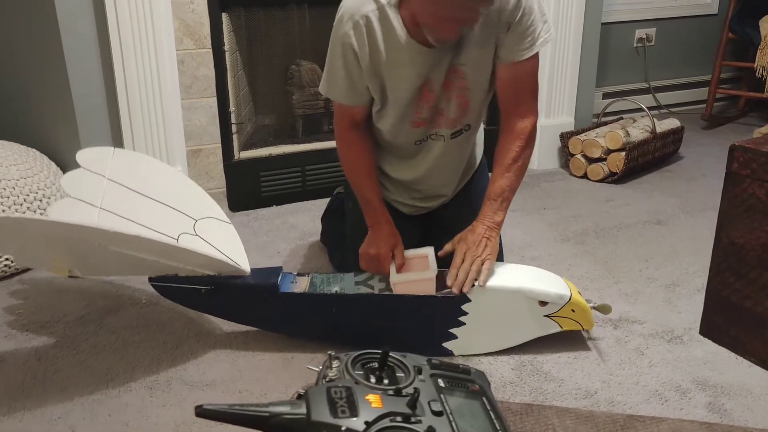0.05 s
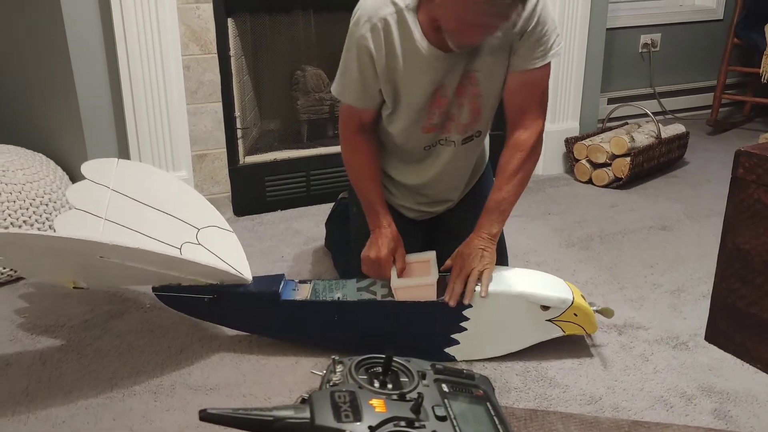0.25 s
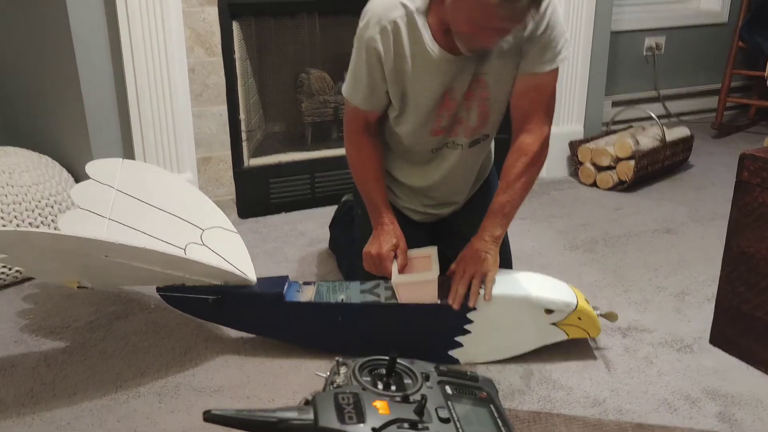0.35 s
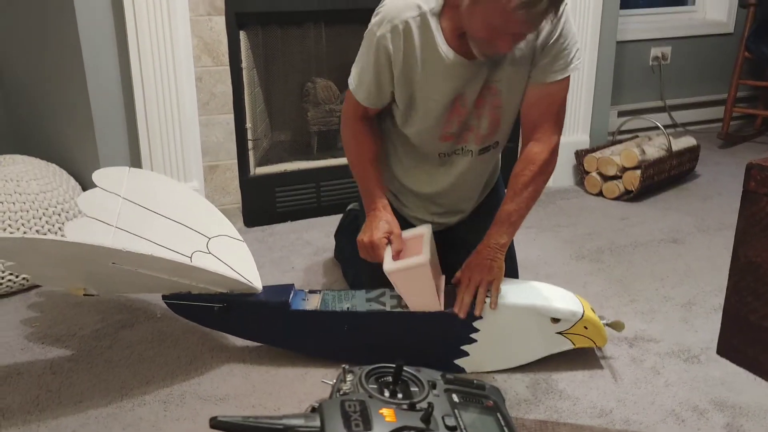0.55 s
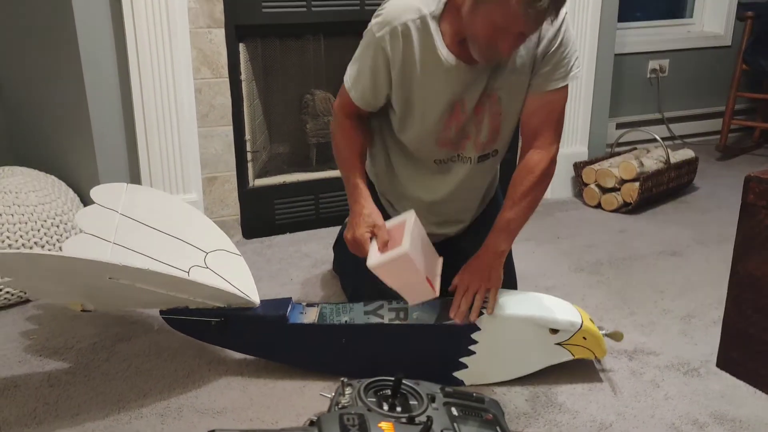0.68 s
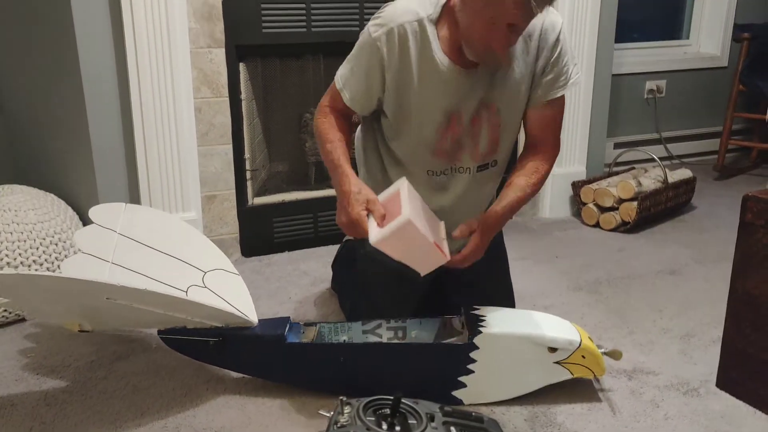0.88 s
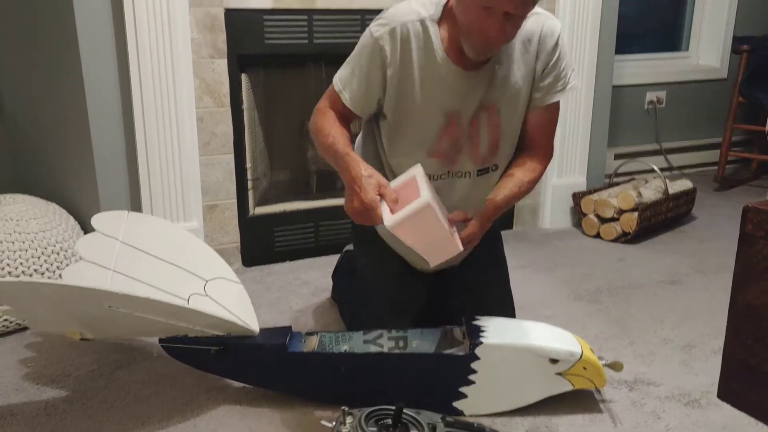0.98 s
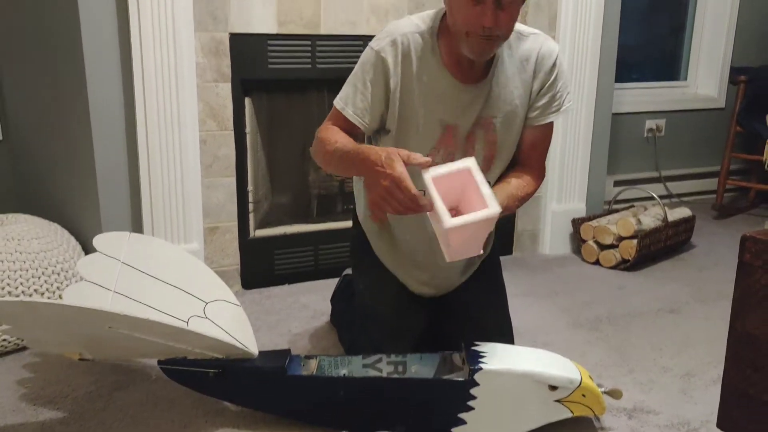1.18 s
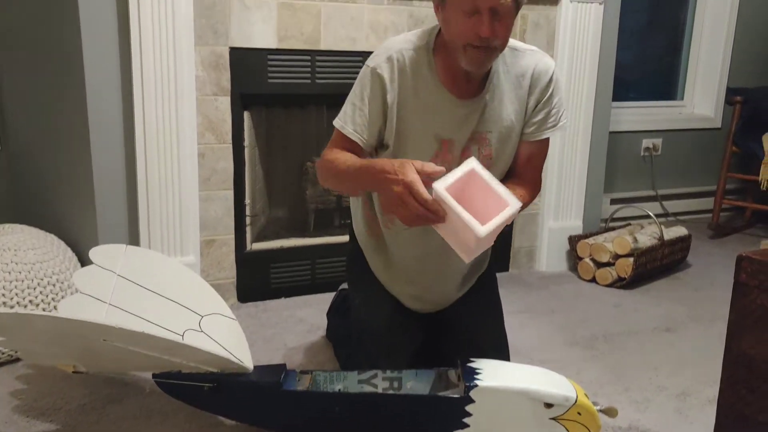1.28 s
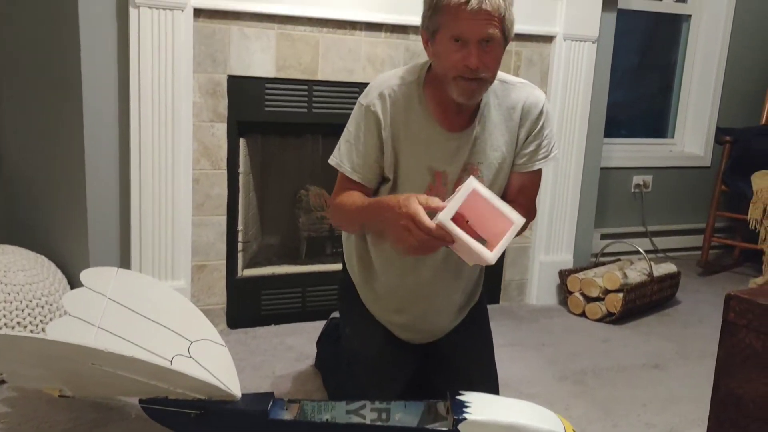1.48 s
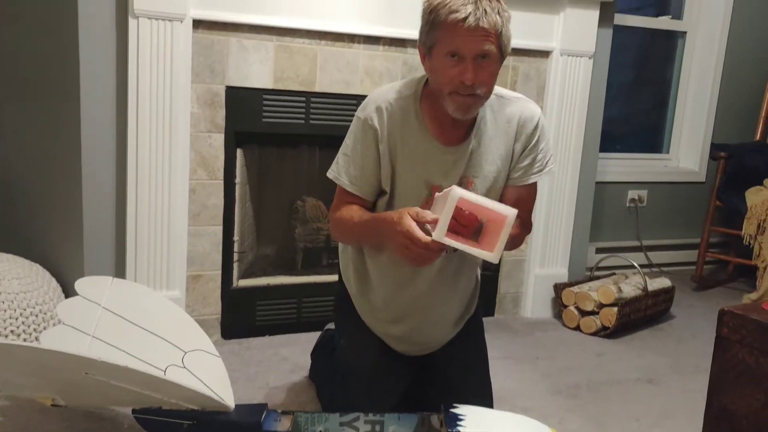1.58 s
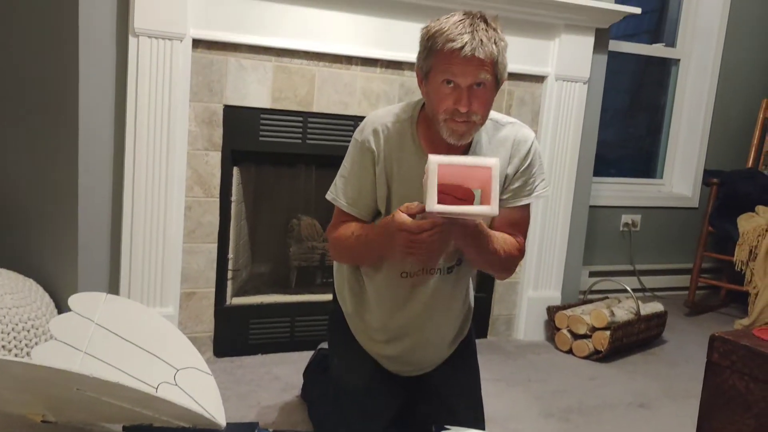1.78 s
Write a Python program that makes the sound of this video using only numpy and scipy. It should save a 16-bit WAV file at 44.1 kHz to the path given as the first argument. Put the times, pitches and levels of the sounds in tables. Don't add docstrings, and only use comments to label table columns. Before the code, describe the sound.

Dry foam-on-foam scraping with dull hollow knocks and snaps, then faint finger rustles in a quiet room

```python
import sys
import numpy as np
from scipy import signal
from scipy.fft import rfft, irfft, next_fast_len
from scipy.io import wavfile
from scipy.ndimage import uniform_filter1d, map_coordinates

SR = 44100
rng = np.random.default_rng(int(sys.argv[2]) if len(sys.argv) > 2 else 0)


def to_linear_factor(level_db):
    exponent = np.asarray(level_db, float) / 20
    return 10 ** exponent


def dump(signal):
    limited = np.clip(np.atleast_2d(signal).T, -1, 1)
    pcm = np.round(limited * 32767).astype(np.int16)
    wavfile.write(sys.argv[1], SR, pcm)


N = 81585

# (frequency [Hz], density [dB per Hz])
HISS_SPECTRUM = [(25, -45), (45, -26), (117, -14), (330, -18), (600, -17.5), (960, -24), (5000, -29),
                 (15900, -31.5)]
# (frequency [Hz], level [dB rms])
MAINS_HUM = [(60, -85), (119, -79.5)]
# (time [s], friction [dB], brightness [dB], hull drive [dB])
DRAG_STROKES = [
    [(0, -55, 7, 8), (.034, -63.5, 2, -1), (.08, -71, 7, 6), (.12, -59, 9, 5.5), (.16, -55, 4.5, 7),
     (.222, -48.5, 3, 8.5), (.24, -45, 6.5, 4)],
    [(.296, -46, 0, 4), (.315, -38, 1, 1), (.33, -35, -9, -2.5), (.36, -32, -3.5, -3.5),
     (.384, -34, 2, -4.5), (.394, -28, -0.5, 0.5), (.41, -38.5, 9.5, 9.5), (.432, -35, 3, 1.5)],
    [(.465, -41.5, 5, -10), (.478, -47.5, 9, -6), (.495, -42, 3, -16), (.514, -43, 7, 1),
     (.53, -42, 12, -2), (.552, -54.5, 11.5, 4), (.575, -51, 2, 3)],
    [(.586, -53.5, -1, -3.5), (.6, -57, 6, -3), (.624, -67, 0, -24), (.68, -65, 5, 8),
     (.692, -65.5, -10, 20.5), (.71, -69.5, 3, 9), (.788, -71, -1, 1), (.86, -88, -7, 3)],
]
# (time [s], pitch [Hz])
CAVITY_PITCH = [(0, 192.8), (0.251, 202.9), (0.379, 252.3), (1.85, 222)]
# (frequency [Hz], density [dB per Hz])
FOAM_SPECTRUM = [(59, -57), (100, -17), (244, -32), (289, -6.5), (1080, -5.5), (2510, -12), (4180, -9),
                 (12100, -17), (15900, -22)]
# (frequency [Hz], width [Hz], gain [dB])
WALL_MODES = [(1090, 150, -0.5), (2050, 57, 9.5), (3350, 480, 2.5), (4200, 1500, 4), (11500, 3200, 7)]
# (frequency [Hz], left-right likeness [0-1])
PORT_LIKENESS = [(60, 0.86), (500, 1), (1200, 0.48), (2400, 0.31), (15000, 0.057)]
# (frequency [Hz], left minus right [dB])
DRAG_LEAN = [(60, -12), (240, -4.5), (950, 0.5), (3770, -7.5), (15000, 0)]
# (middle [s], length [s], pitch [Hz], level
# [dB rms])
TONE_SWELLS = [(0.02, 0.07, 197, -56), (.13, .06, 200, -61), (.012, .045, 685, -57), (.012, .045, 456, -59),
               (0.043, 0.015, 4200, -66.5), (0.129, 0.0048, 4200, -43.5), (.405, .022, 185, -35),
               (.409, .024, 390, -32), (.414, .03, 610, -43), (.425, .016, 235, -37), (.452, .045, 195, -41),
               (.46, .04, 320, -40), (.492, .025, 200, -45), (.537, .04, 205, -42), (.54, .045, 315, -44),
               (.59, .035, 215, -49), (.698, .03, 205, -56), (.53, .03, 14000, -48), (1.02, .03, 150, -68),
               (1.148, .012, 200, -66), (.98, .035, 15000, -64), (1.565, .035, 14200, -62),
               (.39, .03, 12300, -44), (.51, .03, 260, -50), (.565, .03, 270, -50), (.18, .02, 400, -50),
               (0.338, 0.047, 1580, -45), (.345, 0.069, 423, -51), (0.518, 0.018, 11500, -55),
               (.66, 0.0052, 7900, -67), (.693, 0.025, 2180, -69), (1.131, 0.018, 930, -66),
               (0.329, 0.0093, 4200, -43), (0.342, 0.066, 1090, -45), (0.386, 0.0083, 1410, -57),
               (0.521, 0.035, 1770, -55), (0.989, 0.058, 530, -64), (1.021, 0.02, 1880, -54),
               (1.112, 0.041, 1730, -64), (1.233, 0.07, 996, -65), (1.225, .06, 480, -66),
               (1.225, 0.075, 1994, -60.5), (1.385, 0.025, 650, -66), (1.5, 0.049, 530, -62.5),
               (1.574, 0.032, 1900, -60), (1.666, 0.016, 1790, -67.5), (1.725, 0.03, 5900, -66)]
# (time [s], peak [dB], decay t60 [s])
HULL_KNOCKS = [(.003, -53.5, 0.16), (0.109, -54, 0.039), (.149, -55, .05), (0.175, -42.5, 0.06),
               (0.234, -39.5, 0.14), (.397, -32, 0.049), (.404, -30, 0.056), (.414, -30, 0.05),
               (.425, -33, .05), (.438, -34, 0.15), (0.477, -39, 0.14), (0.521, -38, 0.12),
               (.58, -46, 0.055), (.684, -53, 0.033), (.697, -51.5, 0.062), (0.938, -57.5, 0.014)]
# (frequency [Hz], width [Hz], gain [dB])
HULL_MODES = [(101, 127, -12), (187, 31, 2.5), (240.7, 28, -1), (311, 41, 0.5), (384.3, 45, 1),
              (577, 125, -1.5)]
# (time [s], peak [dB], ring [Hz], ring gain [dB], decay t60 [s])
SLIP_SNAPS = [(0.0425, -41, 4350, 8.5, 0.064), (0.0908, -44, 4170, 11, 0.018),
              (0.1027, -47, 6060, 1, 0.0039), (.1101, -36, 3720, 0, 0.0083), (0.1262, -47, 4200, 23, 0.038),
              (0.148, -35, 3400, 0, 0.022), (0.172, -30, 3990, 6.5, 0.03), (.2085, -41, 3970, 1, 0.013),
              (0.2292, -26, 3000, 0, 0.02), (.2322, -23, 4000, 8, .018), (0.3756, -32, 11500, 10, 0.012),
              (.581, -37, 4240, -2, 0.05), (0.6834, -47, 2103, 20, 0.031),
              (1.0076, -36.5, 2380, 49, 0.0055), (1.1225, -49, 3900, 27, 0.0082),
              (1.1475, -40.5, 5000, 0, 0.007), (1.2047, -39, 2000, 40, 0.011), (1.2047, -41, 4080, 25, .02)]
# (time [s], friction [dB], brightness [dB])
FINGER_GRIPS = [
    [(.962, -96, 0), (.967, -52, 3), (1.028, -51, -3.5), (1.054, -58, -7), (1.09, -64, 9.5),
     (1.11, -58.5, -2), (1.125, -59, -8), (1.144, -59.5, -13), (1.16, -69.5, -4)],
    [(1.178, -65.5, -3), (1.2, -55.5, 4), (1.218, -50.5, -8), (1.262, -56.5, -1.5), (1.288, -66.5, 6),
     (1.34, -70.5, 3), (1.386, -60, 4.5), (1.406, -67.5, -1)],
    [(1.45, -60.5, -0.5), (1.48, -56, 3), (1.532, -57.5, 6), (1.57, -52.5, 10), (1.606, -66.5, 3.5),
     (1.636, -74, 8)],
    [(1.67, -63.5, 11), (1.702, -68.5, 8.5), (1.726, -63, 10), (1.79, -73.5, 6), (1.85, -68, 6)],
]
# (frequency [Hz], density [dB per Hz])
SKIN_SPECTRUM = [(150, -22), (250, -13), (1020, -5), (1150, -12.5), (2050, -10.5), (4400, -5),
                 (7660, -14.5), (14300, -15.5), (15900, -17)]
# (frequency [Hz], width [Hz], gain [dB])
HELD_BOX_MODES = [(459, 79, 8.5), (980, 110, -4.5), (1576, 610, 7.5), (4200, 900, -2), (10200, 790, 5.5)]
# (frequency [Hz], left minus right [dB])
HANDS_LEAN = [(60, -11), (950, -0.5), (15000, -2.5)]


def unit(x):
    return x / np.sqrt(np.mean(x ** 2) + 1e-20)


def along(points, hz):
    f, v = np.transpose(points)
    return np.interp(np.log(hz + 1), np.log(f + 1), v)


def curves(tables):
    rows = np.concatenate(tables)
    s, *columns = rows[np.argsort(rows[:, 0])].T
    return [np.interp(np.arange(N) / SR, s, column, left=-120) for column in columns]


def wobble(rate):
    knots = rng.standard_normal(int(N * rate / SR) + 4)
    return map_coordinates(knots, [np.arange(N) * rate / SR])


def filtered(x, response):
    n = x.shape[-1]
    m = next_fast_len(n + 8192)
    return irfft(rfft(x, m) * response(np.fft.rfftfreq(m, 1 / SR)), m)[..., :n]


def ring(hz, centre_hz, width_hz):
    return 1j * hz * width_hz / (centre_hz ** 2 - hz ** 2 + 1j * hz * width_hz)


def place(out, time_s, event):
    start = round(time_s * SR)
    out[:, start:start + event.shape[1]] += event


def ports(pair, lean):
    def mid_side_gains(hz):
        turn = np.arccos(np.clip(along(PORT_LIKENESS, hz), -1, 1)) / 2
        return np.array([np.cos(turn), np.sin(turn)])

    mid, side = filtered(pair, mid_side_gains)
    left_right = np.array([mid + side, mid - side])
    return filtered(left_right, lambda hz: to_linear_factor(np.outer([.5, -.5], along(lean, hz))))


def friction(spectrum, modes, spiky_db, clump_db, patchy_db):
    clumps = clump_db * wobble(400) + clump_db * wobble(69.7)
    size = to_linear_factor(spiky_db * rng.exponential(1, N) + clumps)
    z = signal.stft(size * rng.standard_normal((2, N)), nperseg=512)[2]
    field = uniform_filter1d(rng.standard_normal(z.shape[1:]), size=3, axis=0)
    field = uniform_filter1d(field, size=5, axis=1)
    pair = signal.istft(z * to_linear_factor(patchy_db * unit(field)), nperseg=512)[1][:, :N]

    def walls(hz):
        return 1 + sum((to_linear_factor(db) - 1) * ring(hz, centre, width) for centre, width, db in modes)

    return unit(filtered(pair, lambda hz: to_linear_factor(along(spectrum, hz)) * walls(hz)))


def tilted(x, bright_db, low_db):
    top = filtered(x, lambda hz: 1 / (1 + (7940 / (hz + 1)) ** 4))
    low = filtered(x, lambda hz: 1 / (1 + (hz / 1230) ** 4))
    return x + (to_linear_factor(bright_db) - 1) * top + (to_linear_factor(low_db) - 1) * low


def floor():
    hiss_db = -72.5
    noise = rng.standard_normal((3, N))
    hiss = unit(filtered(noise[:2] + 0.42 * noise[2], lambda hz: to_linear_factor(along(HISS_SPECTRUM, hz))))
    t = np.arange(N) / SR
    hum = sum(to_linear_factor(db + 0.5 * wobble(8.0)) * np.sin(2 * np.pi * hz * t) for hz, db in MAINS_HUM)
    return to_linear_factor(hiss_db) * hiss + hum


def drag():
    cavity_width_hz, cavity_db = 35.35, -16
    t = np.arange(N) / SR
    level_db, bright_db, hull_db = curves(DRAG_STROKES)
    fade = np.clip((DRAG_STROKES[-1][-1][0] - t) / 0.024, 0, 1)
    rub = friction(FOAM_SPECTRUM, WALL_MODES, spiky_db=2.0, clump_db=1.5, patchy_db=2.5)
    scrape = ports(tilted(rub, bright_db, hull_db), DRAG_LEAN)
    s, hz = np.transpose(CAVITY_PITCH)
    phase = 2 * np.pi * np.cumsum(np.interp(t, s, hz)) / SR
    air = (1.5 + wobble(cavity_width_hz)) * np.sin(phase)
    air = unit(air + wobble(cavity_width_hz) * np.cos(phase))
    breath = to_linear_factor(cavity_db + hull_db) * air * to_linear_factor([[-1.1], [1.1]])
    return to_linear_factor(level_db) * fade * (scrape + breath)


def tone_swells():
    out, pad = np.zeros((2, N + SR // 2)), SR // 8
    t = np.arange(-pad, pad) / SR
    for s, length, hz0, db in TONE_SWELLS:
        width_hz = 48 + hz0 / 6.5
        a, b = rng.standard_normal((2, len(t)))
        pair = np.array([a + 0.085 * b, a - 0.94 * b])
        tone = filtered(pair, lambda hz: ring(hz, hz0, width_hz) ** 2)
        swell = np.exp(-2 * (t / (length / 2)) ** 2)
        loudness = np.sqrt(np.sum((swell * tone[0]) ** 2) / np.sum(swell ** 2))
        place(out, s, to_linear_factor(db) * swell * tone / loudness)
    return out[:, pad:pad + N] * to_linear_factor([[-.6], [.6]])


def knocks():
    contact_s, push_s, push_db = 0.00092, 0.00081, 2.5
    out, t = np.zeros((2, N + SR)), np.arange(SR // 3) / SR

    def panels(hz):
        modes = enumerate(HULL_MODES)
        total = sum((-1) ** k * to_linear_factor(db) * ring(hz, centre, width) for k, (centre, width, db) in modes)
        return total * ring(hz, 450, 1200) ** 2

    for s, db, t60 in HULL_KNOCKS:
        envelope = to_linear_factor(-60 * t / t60) * (1 - np.exp(-t / contact_s))
        a, b = rng.standard_normal((2, len(t))) * envelope
        a = a + to_linear_factor(push_db) * t / push_s * np.exp(1 - t / push_s)
        body = filtered(np.array([a + 0.22 * b, a - 0.19 * b]), panels)
        place(out, s, to_linear_factor(db) * body / np.abs(body).max())
    return out[:, :N] * to_linear_factor([[-1.1], [1.1]])


def room(x):
    t60 = 0.31
    t = np.arange(SR // 2) / SR
    tail = rng.standard_normal((2, len(t))) * to_linear_factor(-60 * t / t60)
    tail = filtered(tail, lambda hz: 1 / (1 + hz / 9000))
    late = np.pad(x, ((0, 0), (250, 0)))
    return signal.fftconvolve(late, tail / np.linalg.norm(tail[0]), axes=1)[:, :N]


def snaps():
    rise, ring_q = 0.072, 2.36
    lean_db = np.array([[-2], [2]])
    out, t = np.zeros((2, N + SR)), np.arange(SR // 16) / SR
    for s, db, hz0, ring_db, t60 in SLIP_SNAPS:
        envelope = to_linear_factor(-60 * t / t60) * (1 - np.exp(-t / (rise * t60)))
        burst = rng.standard_normal((2, len(t))) * envelope
        burst[1] = 0.28 * burst[0] + 2.2 * burst[1]

        def foam(hz):
            return ring(hz, 2650, 7800) + to_linear_factor(ring_db) * ring(hz, hz0, hz0 / ring_q) ** 2

        burst = filtered(burst, foam)
        place(out, s, to_linear_factor(db + lean_db) * burst / np.abs(burst).max(axis=1, keepdims=True))
    return out[:, :N]


def grips():
    level_db, bright_db = curves(FINGER_GRIPS)
    rub = friction(SKIN_SPECTRUM, HELD_BOX_MODES, spiky_db=0.3, clump_db=0.78, patchy_db=3.5)
    return to_linear_factor(level_db + 1.0) * ports(tilted(rub, bright_db, 0), HANDS_LEAN)


def scene():
    near = drag() + tone_swells() + knocks() + snaps() + grips()
    room_db = -13.5
    return near + to_linear_factor(room_db) * room(near) + floor()


def band_limit(x):
    return signal.sosfilt(signal.butter(12, 15900, fs=SR, output="sos"), x)


def record(dry):
    mix = filtered(dry, lambda hz: hz < 15880)
    return band_limit(mix)


dry = scene()
out = record(dry)
dump(out)
```